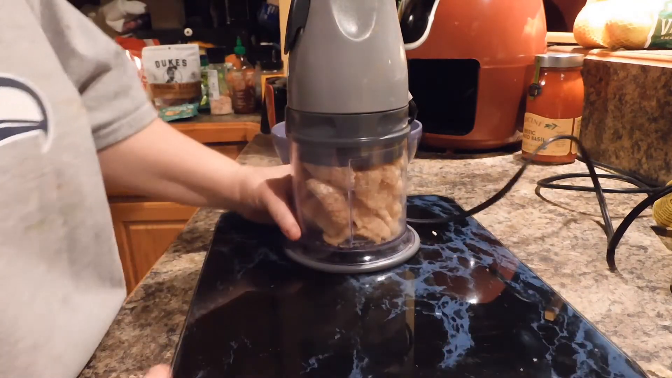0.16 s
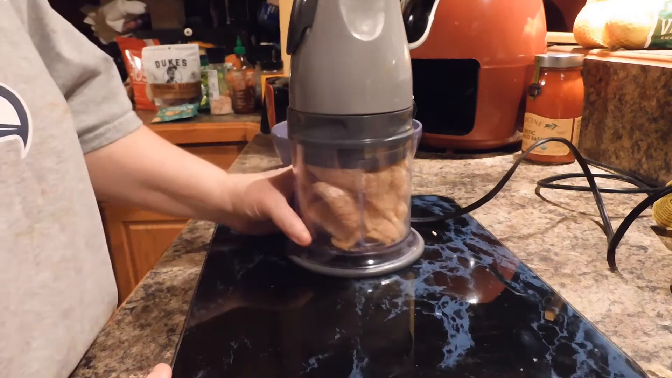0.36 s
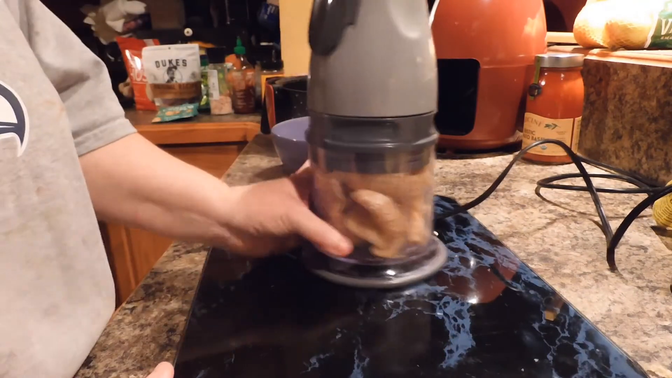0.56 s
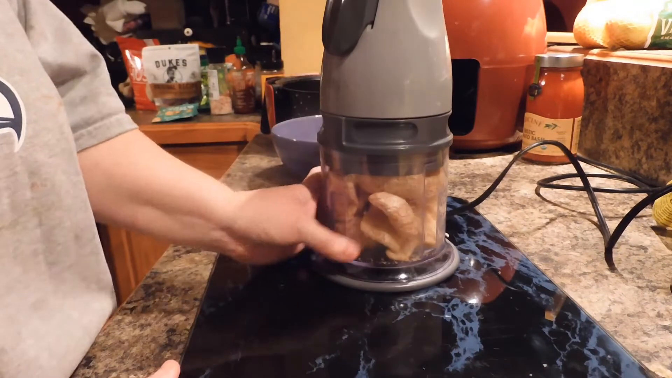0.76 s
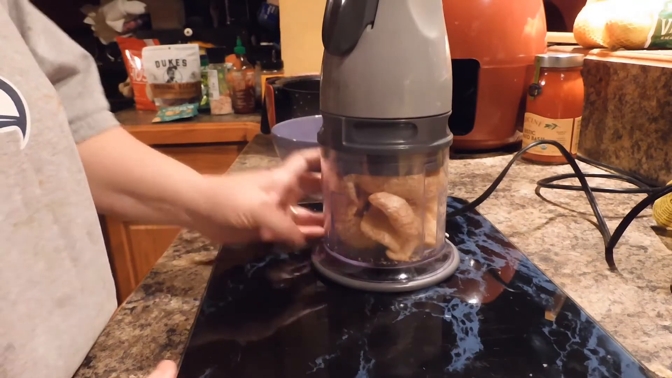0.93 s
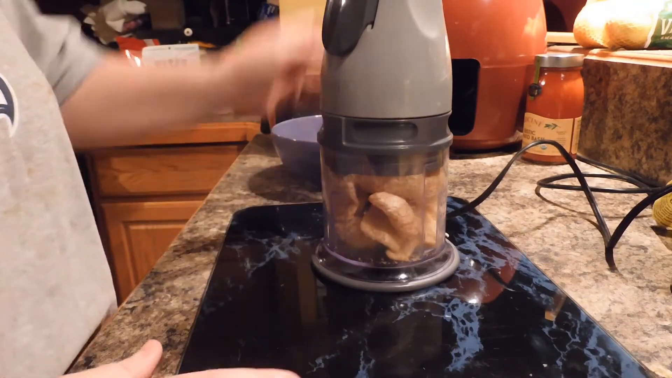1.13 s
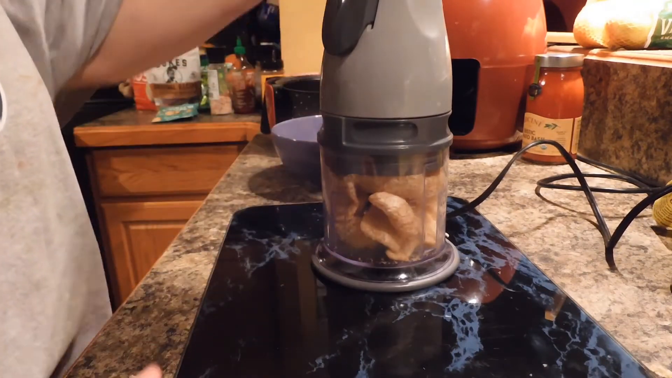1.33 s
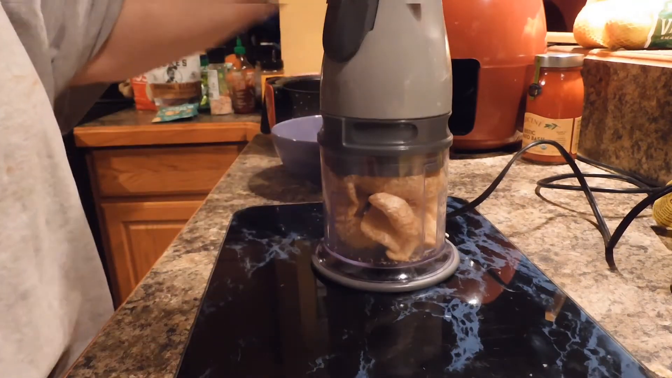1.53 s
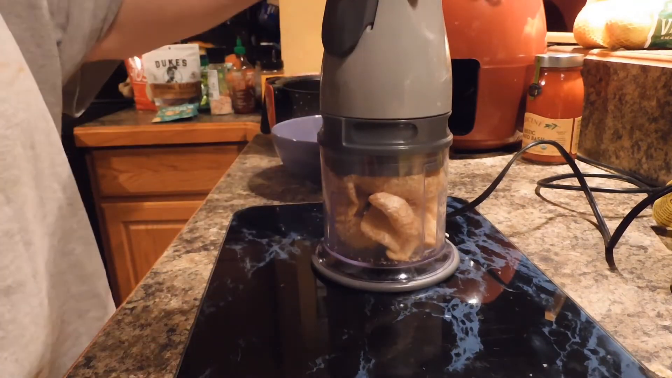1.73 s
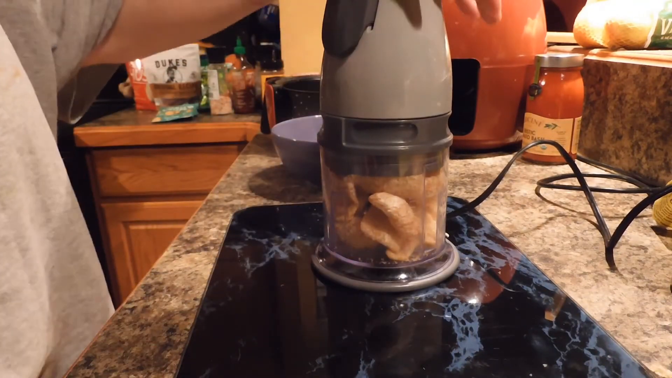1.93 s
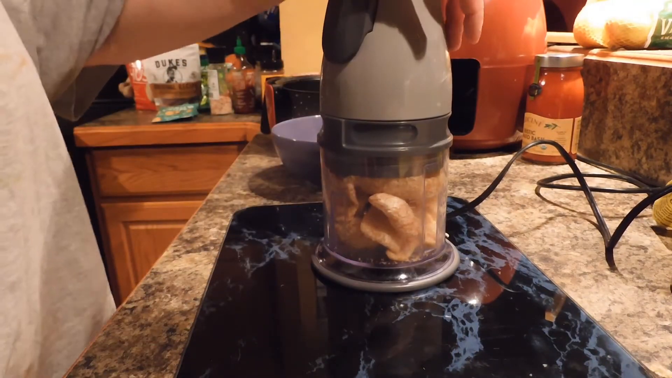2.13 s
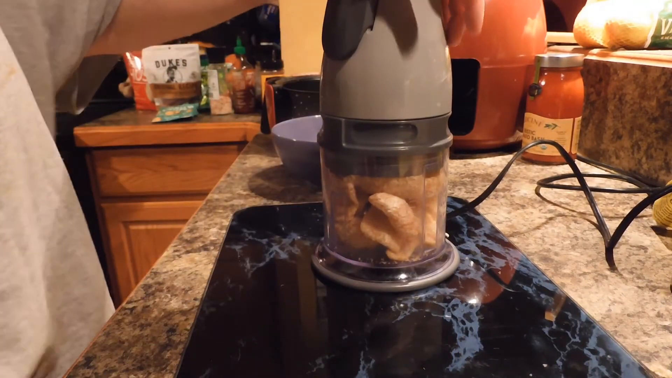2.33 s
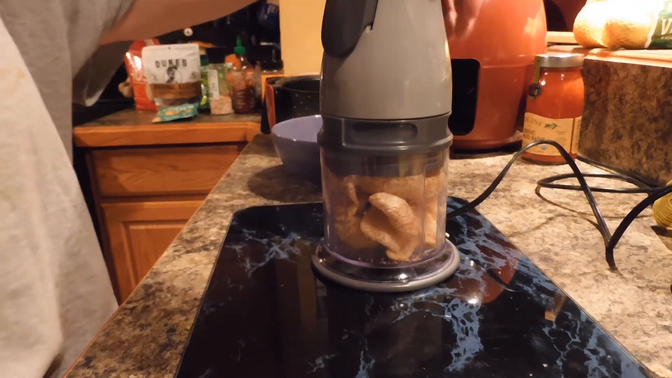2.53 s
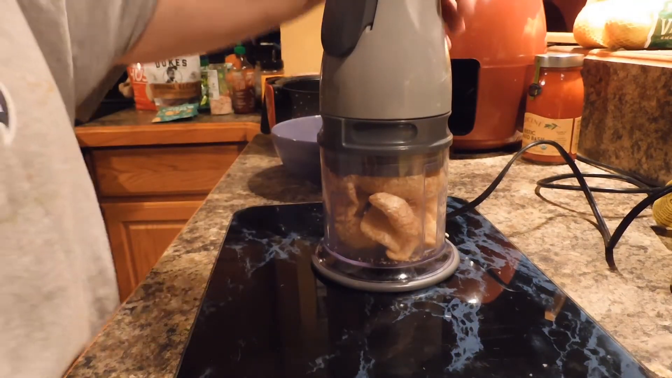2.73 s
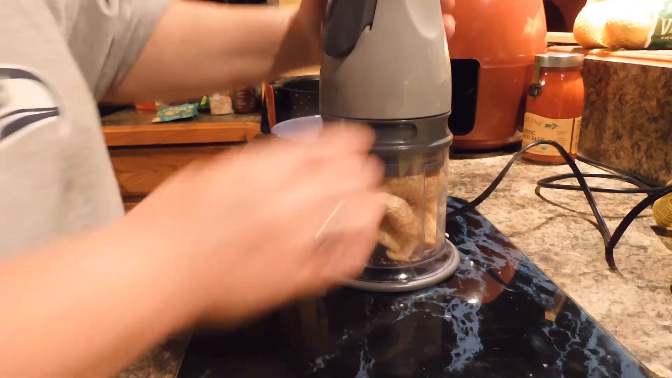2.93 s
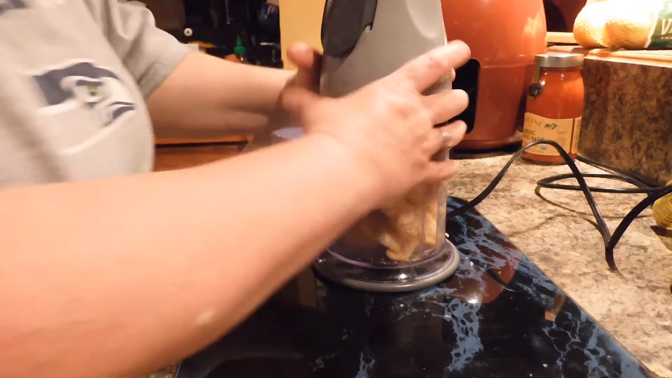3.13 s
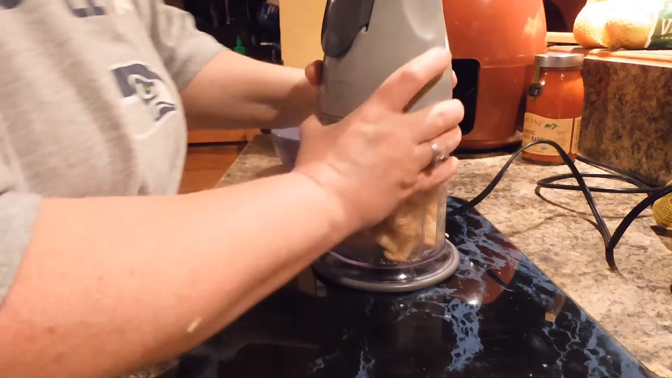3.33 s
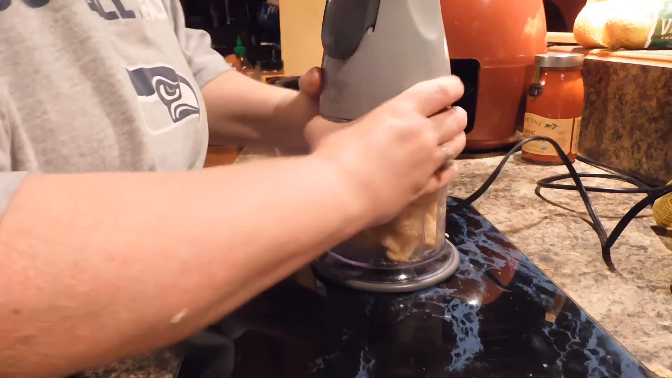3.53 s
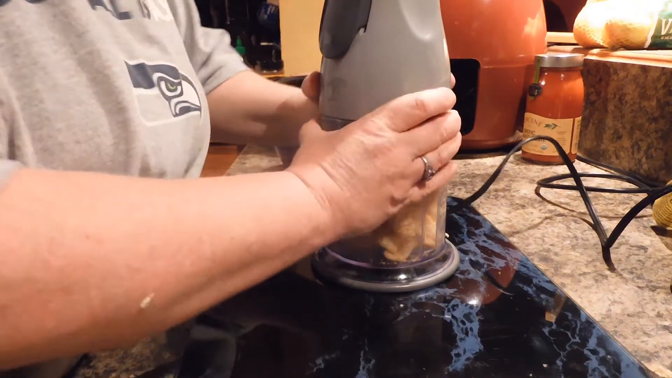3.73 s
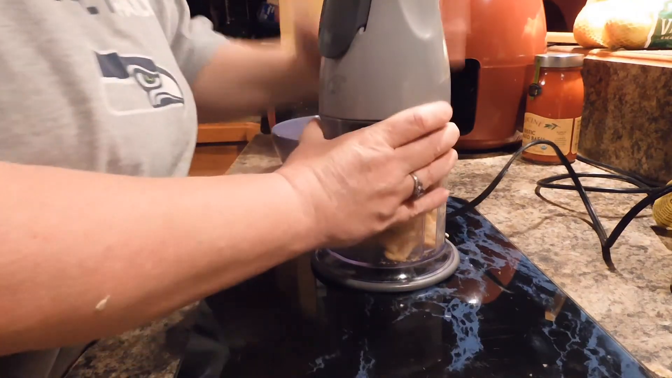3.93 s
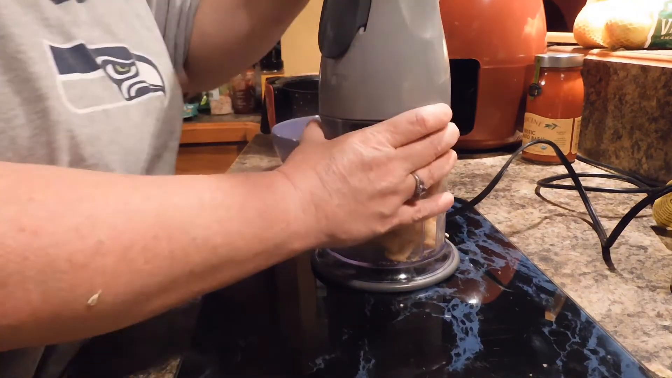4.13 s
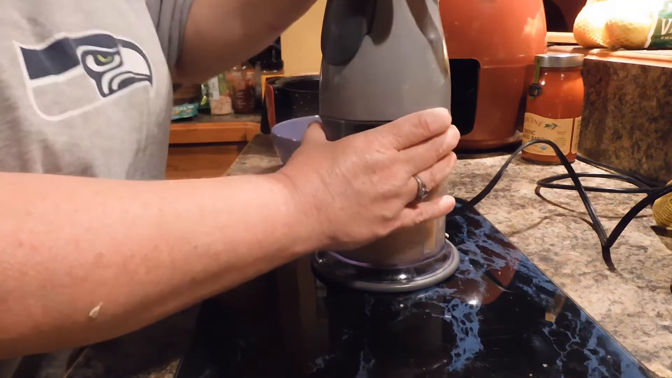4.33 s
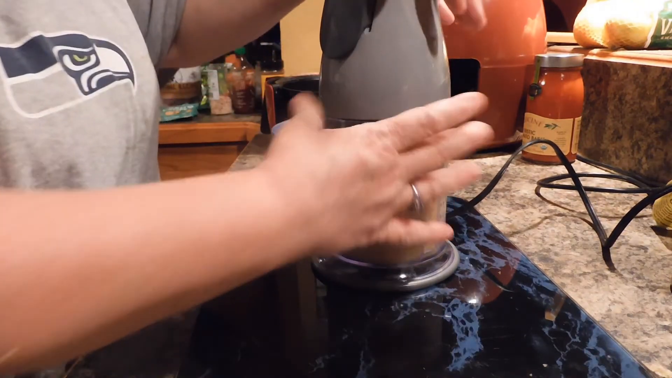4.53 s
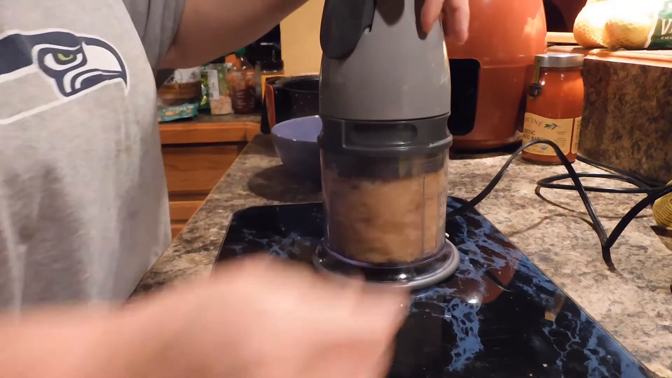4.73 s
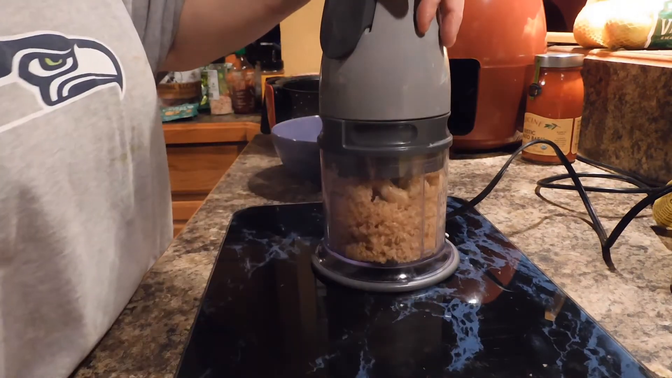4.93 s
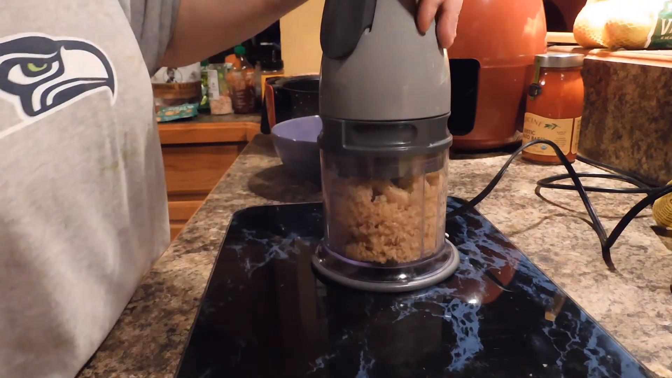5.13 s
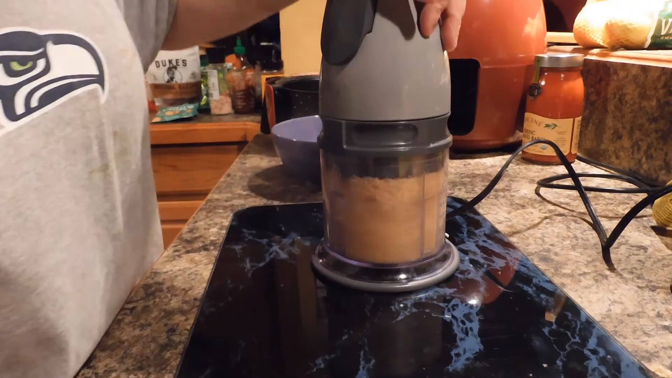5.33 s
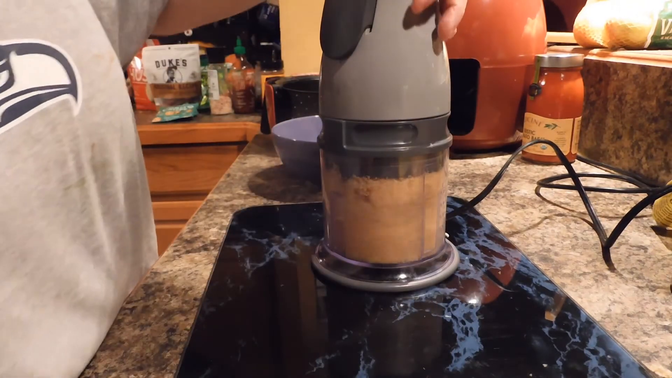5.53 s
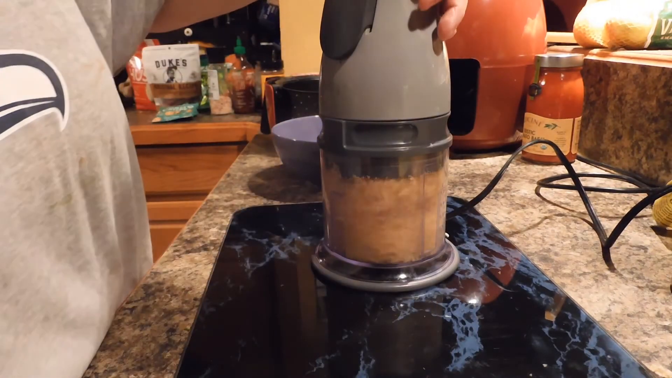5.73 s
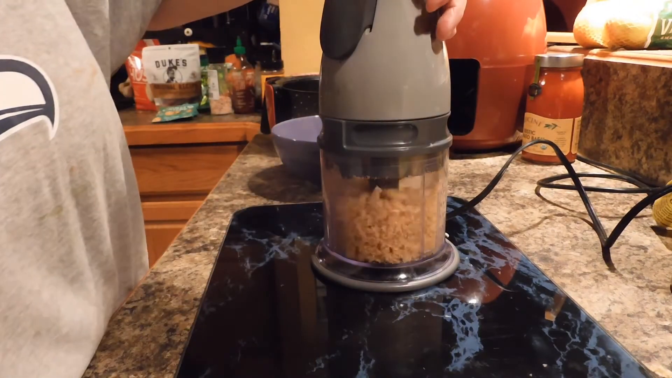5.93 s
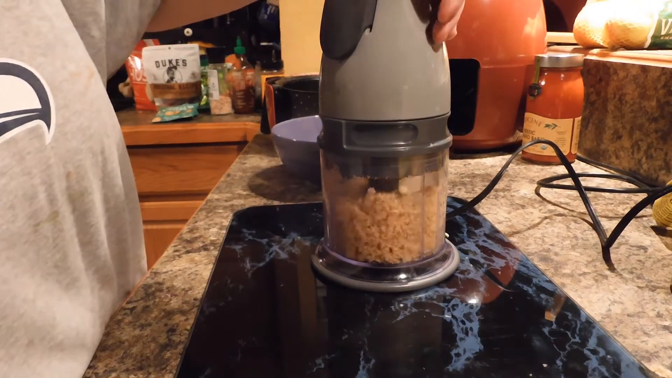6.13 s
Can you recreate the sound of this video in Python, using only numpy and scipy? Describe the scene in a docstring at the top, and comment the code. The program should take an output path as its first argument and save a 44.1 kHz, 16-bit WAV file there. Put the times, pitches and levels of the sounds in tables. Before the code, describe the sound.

Close plastic clicks and a short scrape on a kitchen board, then a small chopper is pulsed twice, crunching loudly and whirring down to rest.

```python
"""Food chopper, two pulses

A small chopper on a kitchen counter, close to a phone. Snaps, light ticks, creaks and slips on the board are made
of short noise bursts ringing plastic bodies; a sleeve brushes, and a damped sine gives a low thump. In each pulse a
hail of impacts rings the bowl over a geared motor's whir, then coasts to rest. Small-room echoes, hum and hiss
surround it.
"""
import sys
import numpy as np
from scipy import signal
from scipy.fft import rfft, irfft, next_fast_len
from scipy.io import wavfile
from scipy.ndimage import uniform_filter1d, minimum_filter1d

SR = 44100
rng = np.random.default_rng(int(sys.argv[2]) if len(sys.argv) > 2 else 0)


def to_wav(sig):
    """Store sig (one row per channel, or 1-D mono) as 16-bit WAV at the path in sys.argv[1].

    Samples outside -1..1 are clipped; the rate is SR.
    """
    pcm = np.clip(np.atleast_2d(sig), -1, 1) * 32767
    pcm = np.round(pcm).astype(np.int16)
    wavfile.write(sys.argv[1], SR, pcm.T)  # frames by channels


N = 276727
T = np.arange(N) / SR


def undb(db):
    """Decibels to gain."""
    return 10 ** (np.asarray(db) / 20)


def unit(x):
    """Scale to rms 1."""
    return x / np.sqrt(np.mean(x ** 2) + 1e-18)


def shape(points, hz):
    """Spectrum in dB, interpolated on log frequency."""
    f, db = np.transpose(points)
    return np.interp(np.log(hz + 1), np.log(f), db)


def modes_db(modes, hz, wall_db):
    """Resonances standing out of the broad response of a plastic wall."""
    power = sum(undb(db) ** 2 / (1 + (2 * (hz - f) / width) ** 2) for f, width, db in modes)
    return 10 * np.log10(power + undb(wall_db) ** 2)


def ring(x, db_of, size=4096):
    """Minimum-phase filter: a causal body whose gain in dB is a function of frequency."""
    cepstrum = irfft(np.log(undb(db_of(np.fft.rfftfreq(size, 1 / SR)))))
    # fold onto positive time
    cepstrum[1:size // 2] *= 2
    cepstrum[size // 2 + 1:] = 0
    response = irfft(np.exp(rfft(cepstrum)))
    return signal.fftconvolve(x, response)[:len(x)]


def band(x, lo_hz, hi_hz):
    """Zero-phase band-pass, so that neighbouring bands add up evenly."""
    size = next_fast_len(len(x) + 2048)
    hz = np.fft.rfftfreq(size, 1 / SR) + 1
    spectrum = rfft(x, size) / (1 + (lo_hz / hz) ** 10) / (1 + (hz / hi_hz) ** 10)
    return irfft(spectrum, size)[:len(x)]


def walk(rate_hz):
    """Slow smoothed chance, rms 1."""
    k = int(SR / rate_hz)
    steps = np.repeat(rng.standard_normal(N // k + 1), k)
    return unit(uniform_filter1d(steps, k)[:N])


def blows(rows, body, focus_db, rise_ms, low_hz=1290, size=4096):
    """Each blow is a noise burst dying in milliseconds; it rings the body most strongly near its own centre.

    Rows: t/s, level/dB, centre f/Hz, decay/ms, boost below low_hz/dB.
    """
    out = np.zeros(N + size)
    t_ms = np.arange(size) / SR * 1000
    for s, db, hz, decay_ms, boost_db in rows:
        fade = np.exp(-t_ms / decay_ms) * (1 - np.exp(-t_ms / rise_ms))

        def response_db(f):
            focus = -focus_db * np.minimum(np.log2((f + 1) / hz) ** 2, 3)
            return body(f) + focus + boost_db / (1 + (f / low_hz) ** 4)

        blow = ring(rng.standard_normal(size) * fade, response_db)
        # the body colours the burst, the row sets its energy
        blow *= np.sqrt(np.sum(fade ** 2) / np.sum(blow ** 2))
        start = int(s * SR)
        out[start:start + size] += undb(db) * blow
    return out[:N]


def flurry(span_s, db, hz, decay_ms, count, scatter_db=3, scatter_octaves=.2):
    """Rows of small blows at uneven steps through a span, each with its own strength and colour."""
    place, strength, colour = rng.uniform(-1, 1, (count, 3)).T
    start, end = span_s
    times = start + (end - start) * (np.arange(count) + .5 + .5 * place) / count
    levels = np.broadcast_to(db, N)[(times * SR).astype(int)] + scatter_db * strength
    centres = hz * 2 ** (scatter_octaves * colour)
    return [(s, level, centre, decay_ms, 0) for s, level, centre in zip(times, levels, centres)]


# air noise spectrum: f/Hz, relative level/dB
AIR_COLOUR = [(18, -30), (30, -28.5), (48, -28), (174, -12), (204, -1.5), (239, -13.5), (303, -7.5),
              (345, -12), (426, -1), (569, -7), (632, 1), (913, -3.5), (3980, -4.5), (8080, -20.5),
              (16000, -44.5)]
# appliance hum partials: f/Hz, relative level/dB
HUM_PARTIALS = [(59.2, -81), (106, -80.5), (211, -68.5), (797, -69), (2105, -74.5), (2789, -69),
                (2848, -66.5)]
MURMUR_DB, HISS_DB = -55, -62  # rms in 220-2000 Hz and 4.3-11 kHz


def background(hum_db=-1):
    """Appliance hum and airy hiss: wavering sines over coloured noise."""
    air = ring(rng.standard_normal(N), lambda f: shape(AIR_COLOUR, f))
    murmur = band(air, 25, 2830) / np.std(band(air, 220, 2000)) * undb(MURMUR_DB + 0.33 * walk(16))
    hiss = band(air, 2600, 16000) / np.std(band(air, 4300, 11000)) * undb(HISS_DB + .4 * walk(13.0))
    hum = np.zeros(N)
    for hz, db in HUM_PARTIALS:
        level = np.sqrt(2) * undb(db + hum_db + 2 * walk(4.1))
        hum += level * np.sin(2 * np.pi * hz * T + 0.5 * walk(7.7))
    return murmur + hiss + hum


# motor housing, broad response: f/Hz, gain/dB
PLASTIC = [(120, -13.5), (400, -5.5), (850, -6.5), (1300, -0.5), (2500, 0.5), (4200, 0.5), (6200, -4),
           (8500, -7), (10000, -10.5), (13000, -17.5), (16000, -22)]
# motor housing resonances: f/Hz, width/Hz, gain/dB
HOUSING_MODES = [(1380, 270, 1.5), (1795, 120, 0.5), (2840, 140, 0.5), (3510, 70, -7), (4160, 200, 0.5),
                 (5430, 200, -17), (7350, 350, 1), (8570, 350, 3)]


def housing_db(hz):
    """Response of the motor housing and its catches."""
    return shape(PLASTIC, hz) + modes_db(HOUSING_MODES, hz, wall_db=1.0)


# catches and snaps of the housing: t/s, relative level/dB, centre f/Hz, decay/ms, low boost/dB
SNAPS = [(0.1511, -2, 5560, 1.57, 4), (1.5652, -14.5, 4800, 13, 5), (1.5712, -2, 7800, 2.37, -8.5),
         (1.5728, 3, 4120, 2.44, 3), (1.5752, 1.5, 2340, 1.6, 2.5), (1.7145, -20, 3570, 6.5, 17.5),
         (2.0012, -20.5, 4980, 8.9, 12), (2.0183, -10, 4310, 0.95, -4), (2.0276, -1, 3170, 1.8, 6),
         (3.3286, -19.5, 3860, 2.35, -8), (3.473, -25.5, 3620, 6.2, 20), (3.4875, -16, 4830, 2.2, -4),
         (3.5042, -15.5, 4600, 3.7, 26), (3.6152, -16, 3900, 1.47, 27), (4.218, -3, 4960, 1.8, 10),
         (4.227, 4.5, 3870, 3, 10.5), (5.2068, -17.5, 3520, 2.15, -1), (6.2542, -17.5, 4260, 2.1, 12)]
# light ticks, from handling or a settling piece: t/s, relative level/dB
TICKS = [(2.3743, -32.5), (2.4115, -31.5), (3.2008, -30), (3.36, -28.5), (3.684, -33), (3.8988, -31.5),
         (4.865, -30.5), (5.196, -28)]
TICK_HZ, TICK_DECAY_MS = 3500, 3.6


def snaps_and_ticks():
    """Snaps, light ticks and creaks: short noise bursts through the housing response."""
    ticks = [(s, db, TICK_HZ, TICK_DECAY_MS, 0) for s, db in TICKS]
    return undb(-3) * blows(SNAPS + ticks + creaks(), housing_db, focus_db=7.0, rise_ms=0.55)


def creaks(db=-38):
    """Rows: the hand tightens its grip and the housing creaks faintly."""
    grip_s = (3.4, 4.0)
    return flurry(grip_s, db, TICK_HZ, TICK_DECAY_MS, count=4)


# base on the board, broad response: f/Hz, gain/dB
BASE = [(47, -68), (80, -42), (174, -5), (305, -13), (547, -4), (940, -16.5), (1050, -11.5), (1330, -20),
        (1450, -14.5), (1580, -13.5), (3910, -11.5), (7320, -24), (14000, -55)]


def base_db(hz):
    """Response of the base on the board, weakly coupled to the bowl."""
    return shape(BASE, hz) + modes_db(BOWL_MODES, hz, wall_db=12)


# base lets go and slips: t/s, relative level/dB, centre f/Hz, decay/ms
SLIPS = [(0.485, -22, 517, 6.6), (0.506, -20, 450, 9.3), (0.521, -10.5, 2580, 2.2),
         (0.573, -12.5, 1990, 7.6), (0.553, -22, 3000, 7), (0.595, -14.5, 540, 14), (0.626, -8, 4220, 5.7),
         (0.653, -12, 2670, 4.4), (0.668, -17.5, 550, 3.8), (3.285, -35.5, 400, 26)]
# small catches all through the push
PUSH_S, JUDDER_DB, JUDDER_HZ, JUDDER_DECAY_MS = (0.49, 0.66), -17.5, 1500, 2.4


def sliding():
    """The base sticks and slips across the board."""
    slips = [(*row, 0) for row in SLIPS]
    judder = flurry(PUSH_S, JUDDER_DB, JUDDER_HZ, JUDDER_DECAY_MS, count=12)
    return undb(-10) * blows(slips + judder, base_db, focus_db=1.5, rise_ms=0.83)


# sleeve brushes as the arm moves: middle t/s, half length (to 1/e)/s, relative level/dB
RUSTLES = [(0.92, 0.041, -79), (1.445, 0.14, -66), (3.028, 0.16, -67), (3.5, 0.22, -64), (3.92, .08, -76)]


def sleeve(lo_hz=3000, hi_hz=15000, tilt_db_per_octave=-4):
    """Cloth brushes in soft swells of hiss."""
    noise = band(rng.standard_normal(N), lo_hz, hi_hz)
    cloth = ring(noise, lambda f: tilt_db_per_octave * np.log2(1 + f / lo_hz))
    swells = sum(undb(db) * np.exp(-((T - s) / half_s) ** 2) for s, half_s, db in RUSTLES)
    return unit(cloth) * swells


def low_thump(at_s=1.573, db=-41, hz=55, decay_s=.011):
    """A short, soft, low thump under a hard snap: a damped sine."""
    t = np.maximum(T - at_s, 0)
    return undb(db) * np.sin(2 * np.pi * hz * t) * np.exp(-t / decay_s)


# bowl, broad response: f/Hz, gain/dB
BOWL = [(71, -71), (120, -35.5), (196, -27), (348, -28.5), (427, -20), (742, -19.5), (1090, -22),
        (1550, -16), (1680, -6.5), (1940, -6.5), (2290, -1.5), (4060, 2), (7660, -2.5), (12500, -28.5),
        (16000, -49)]
# bowl resonances: f/Hz, width/Hz, gain/dB
BOWL_MODES = [(520, 62, -24), (820, 93, -3), (1678, 89, -7), (2258, 45, -1), (2444, 58, 0), (2910, 200, -2),
              (3280, 250, -4), (3995, 130, -4.5), (4540, 220, -2), (5620, 120, -5.5), (5950, 150, -2),
              (7570, 240, -7.5), (8860, 240, 0), (10560, 200, 2.5)]


def bowl_db(hz):
    """Response of the bowl, struck from inside."""
    return shape(BOWL, hz) + modes_db(BOWL_MODES, hz, wall_db=-6)


# motor pulses: on t/s, off t/s, at rest t/s, relative crumb level at full speed/dB, extra while whole/dB
PULSES = [(4.233, 4.313, 4.792, -17.5, 10), (5.218, 5.337, 5.9, -16, 3)]
BREAK_UP_S = 0.058  # time constant of smashing the whole pieces
SETTLE_S = 0.078  # crumbs trickle down after the blade has slowed
HAIL_POWER, HEAVY_POWER = 1.345, .75  # amplitude ~ speed ** power; heavy pieces tumble on for longer
HEAVY_DB = -20  # re crumbs at full speed
CHIP_OVER_DB = 2.5  # smaller chips re hail of crumbs


def pulse(on, off, rest, db, whole_db, bite_s=0.0046, heavy_whole_db=9, catch_s=0.0048):
    """One press of the switch: loudest while the pieces are whole, then fading with the blade speed."""
    speed = speed_of(on, off, rest)
    since = np.maximum(T - on, 0)
    whole = np.exp(-since / BREAK_UP_S)
    # the blade bites before it is up to speed; what it has thrown takes a moment to fall
    thrown = speed_of(on, off, rest, bite_s)
    keep = np.exp(-1 / (SETTLE_S * SR))
    settling = signal.lfilter([1 - keep], [1, -keep], thrown)
    flying_db = 20 * np.log10(np.maximum(thrown, settling) + 1e-6)
    load_db = db + whole_db * whole * (1 - np.exp(-since / catch_s))
    hail_db = load_db + HAIL_POWER * flying_db
    heavy_db = load_db + HEAVY_DB + heavy_whole_db * whole + HEAVY_POWER * flying_db
    chips = flurry((on, rest), hail_db + CHIP_OVER_DB, CRACK_HZ, CRACK_DECAY_MS, count=22, scatter_db=1.0)
    return crumbs(speed, hail_db, heavy_db) + motor(speed) + cracking(chips)


def speed_of(on, off, rest, spin_up_s=0.021):
    """Share of full speed: a quick run-up, then friction slows the blade evenly."""
    run_up = 1 - np.exp(-np.maximum(T - on, 0) / spin_up_s)
    return run_up * np.clip((rest - T) / (rest - off), 0, 1)


SHAFT_HZ = 65  # full speed


def motor(speed, gear_ratio=5.2, whir_db=-41, hum_db=-49, rough=0.045):
    """The geared motor hums at rotor speed and whirs on its multiples, sinking in pitch as it coasts."""
    rotor_hz = SHAFT_HZ * gear_ratio * speed * (1 + rough * walk(60))
    phase = 2 * np.pi * np.cumsum(rotor_hz) / SR
    offsets = rng.uniform(0, 2 * np.pi, size=16)
    whir = sum(np.cos(k * phase + offset) / k for k, offset in enumerate(offsets, 1))
    whir = ring(whir * speed, bowl_db)
    whir /= np.sqrt(np.mean(whir[speed > .5] ** 2))
    # strongest while the rotor passes through this band
    hum = band(np.sin(phase) * speed, 150, 255)
    return undb(whir_db) * whir + undb(hum_db) * hum


def grains(rate_hz, spread_db):
    """Random impacts over faint noise, a few far harder than the rest, at an even mean power."""
    sizes = undb(spread_db * np.minimum(rng.exponential(size=N), 5)) * rng.choice([-1, 1], N)
    hits = (rng.random(N) < rate_hz / SR) * sizes + 0.34 * rng.standard_normal(N)
    return hits / np.sqrt(uniform_filter1d(hits ** 2, size=900))


DUST_DB = -21.5  # re crumbs


def crumbs(speed, hail_db, heavy_db, impacts_per_s=7000, sweep_db=0.55, clump_db=0.1, size_db=3.0):
    """Two blades sweep clumps of crumbs against the wall; the hail thins out as they slow."""
    turns = np.cumsum(SHAFT_HZ * speed) / SR
    # two sweeps per turn
    sweep = unit(undb(sweep_db * np.cos(4 * np.pi * turns) + clump_db * walk(170)))
    wall = ring(grains(impacts_per_s * (.15 + speed), spread_db=3.0) * sweep, bowl_db)
    # pieces of each size arrive in their own clumps and crunch in their own range
    edges_hz = np.geomspace(1300, 9800, num=6)
    crunch = sum(band(wall, lo, hi) * undb(size_db * walk(140)) for lo, hi in zip(edges_hz, edges_hz[1:]))
    heavy = unit(band(wall, 130, 1576)) * undb(heavy_db)
    dust = unit(band(wall, 11440, 17000)) * undb(DUST_DB)
    return (unit(crunch) + dust) * undb(hail_db) + heavy


CRACK_HZ, CRACK_DECAY_MS = 4300, 1.6


def cracking(rows):
    """Pieces break on the blade and ring the bowl."""
    return undb(-6) * blows(rows, bowl_db, focus_db=5.5, rise_ms=0.28)


# biggest pieces breaking on the blade: t/s, relative level/dB
CRACKS = [(4.2456, 1), (4.2603, -6), (4.2895, -15), (4.31, -3), (4.3216, 1), (4.3414, -4), (4.4003, 2),
          (4.4302, 2), (4.595, -3), (4.6767, -11.5), (5.2506, 0.5), (5.2809, 1), (5.3008, -2),
          (5.3335, 1.5), (5.4625, 0), (5.626, -1), (5.775, -7)]


def big_cracks():
    """The biggest pieces snap one by one, each a short burst through the bowl."""
    return cracking([(s, db, CRACK_HZ, CRACK_DECAY_MS, 0) for s, db in CRACKS])


def kitchen(x, wet_db, early_db, t60_s=0.41, treble_t60_s=0.25, early_s=0.0091, size=26000):
    """Quick reflections from the counter and the things on it, then the short tail of the room."""
    t = np.arange(size) / SR
    noise = rng.standard_normal((3, size))
    tail = band(noise[0], 120, 7000) * undb(-60 * t / t60_s)
    tail += band(noise[1], 6340, 15000) * undb(-60 * t / treble_t60_s + 0.5)
    tail *= np.clip(t / 0.00073, 0, 1)
    early = noise[2] * np.exp(-t / early_s) * (t > .002)
    echoes = (undb(wet_db) * unit(tail) + undb(early_db) * unit(early)) / np.sqrt(size)
    return x + signal.fftconvolve(x, echoes)[:N]


def ports(mid, width, left_db, scatter_s=0.021, size=4096):
    """Two close microphone ports: scattered sound is added at one and subtracted at the other."""
    scatter = rng.standard_normal(size) * np.exp(-np.arange(size) / SR / scatter_s)
    scattered = signal.fftconvolve(mid, unit(scatter) / np.sqrt(size))[:N]
    side = ring(scattered, lambda f: shape(width, f))
    return np.array([undb(left_db / 2) * (mid + side), undb(-left_db / 2) * (mid - side)])


# stereo width of the chopper: f/Hz, side re mid/dB
CHOPPER_WIDTH = [(60, -9), (110, -9), (200, -26.5), (380, -22.5), (700, -20), (1290, -20), (2380, -22),
                 (4400, -13.5), (8120, -15), (15000, -1.5)]
# stereo width of background and sleeve: f/Hz, side re mid/dB
AIR_WIDTH = [(60, -10.5), (110, -18.5), (200, -13.5), (380, -18.5), (700, -19), (1290, -17), (2380, -13),
             (4400, -8.5), (8120, -16.5), (15000, -14)]


def scene():
    """Handling and two pulses, each with its own paths through the room."""
    out = kitchen(snaps_and_ticks(), wet_db=-16, early_db=-11)
    out += kitchen(sliding(), wet_db=-13.5, early_db=-8.5)
    for row in PULSES:
        out += kitchen(pulse(*row), wet_db=-10.5, early_db=-20.0)
    out += kitchen(big_cracks(), wet_db=-20.0, early_db=-2)
    # a small plastic body radiates little bass
    chopper = band(out, 155, 20000) + low_thump()
    air = background() + sleeve()
    return ports(chopper, CHOPPER_WIDTH, left_db=-0.13) + ports(air, AIR_WIDTH, left_db=-0.56)


def suppressor(x, memory_s=0.16, share_db=-6, depth=1.33, make_up=0.67, size=640):
    """Noise reduction takes the recent past for noise: as a loud sound fades, weaker bins close."""
    hop = size // 4
    _, _, bins = signal.stft(x, nperseg=size, noverlap=size - hop)
    power = uniform_filter1d(np.mean(np.abs(bins) ** 2, axis=0), size=15, axis=1).clip(1e-16)
    # the memory follows the level in decibels, so it soon forgets a loud sound
    keep = np.exp(-hop / SR / memory_s)
    start = power[:, 4:5]
    rise = np.log(power / start)
    past = start * np.exp(signal.lfilter([1 - keep], [1, -keep], rise, axis=1))
    gain = 1 / (1 + (undb(share_db) ** 2 * past / power) ** depth)
    # make-up gives back part of the level of each broad band
    broad_gain = np.sqrt(uniform_filter1d(gain ** 2, size=19, axis=0).clip(1e-16))
    gain /= broad_gain ** make_up
    return signal.istft(bins * gain, nperseg=size, noverlap=size - hop)[1][:, :N]


def limiter(x, ceiling_db=2.0, size=45):
    """The gain ducks for about 2 ms around the hardest peaks; what still overloads is clipped flat."""
    gain = 1 / np.maximum(np.abs(x).max(axis=0) / undb(ceiling_db), 1)
    smooth_gain = uniform_filter1d(minimum_filter1d(gain, size), size)
    return np.clip(x * smooth_gain, -.95, .95)


TOP_HZ = 15900


def record(dry):
    """The phone reduces noise, limits the hardest snaps and cuts the top."""
    low_pass = signal.ellip(8, .2, 70, TOP_HZ, fs=SR, output="sos")
    return signal.sosfilt(low_pass, limiter(suppressor(dry)))


dry = scene()
out = record(dry)
to_wav(out)
```